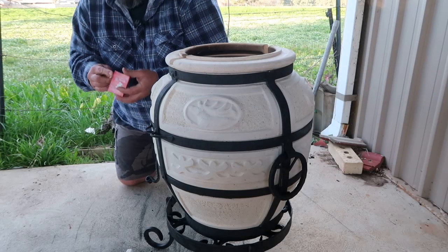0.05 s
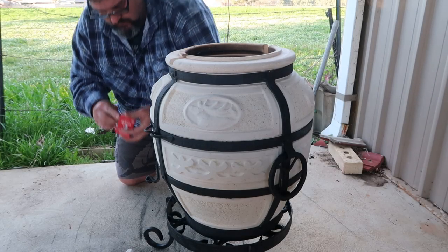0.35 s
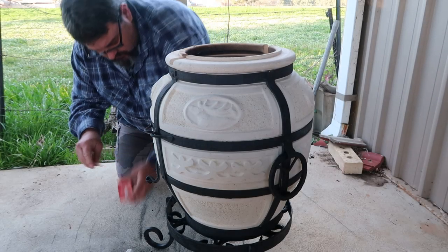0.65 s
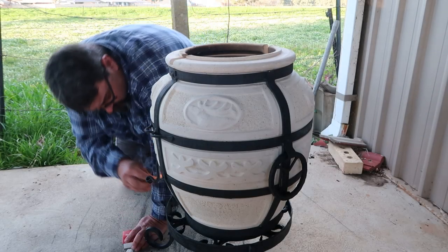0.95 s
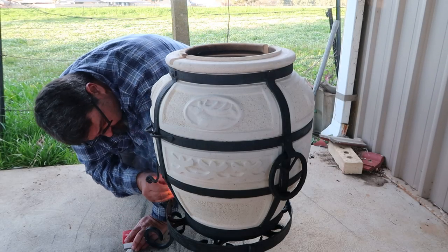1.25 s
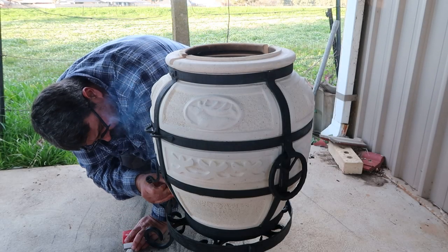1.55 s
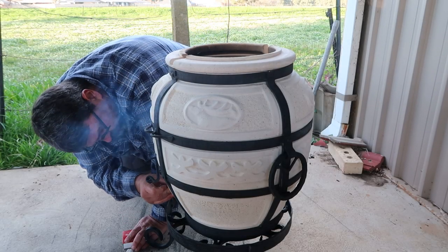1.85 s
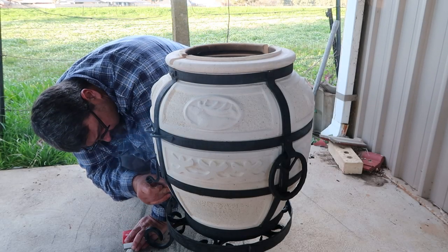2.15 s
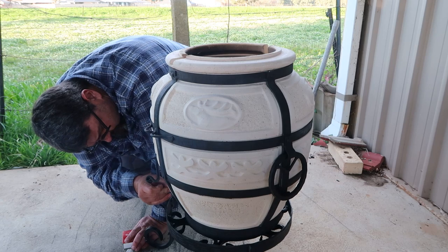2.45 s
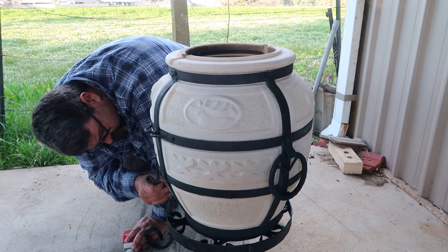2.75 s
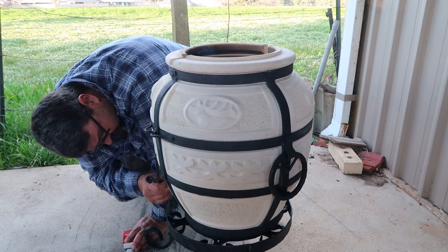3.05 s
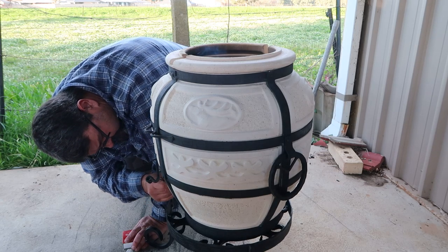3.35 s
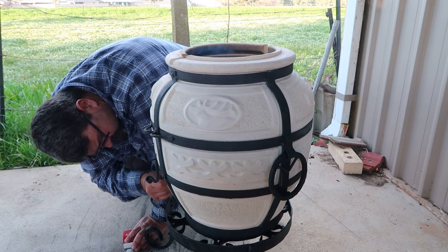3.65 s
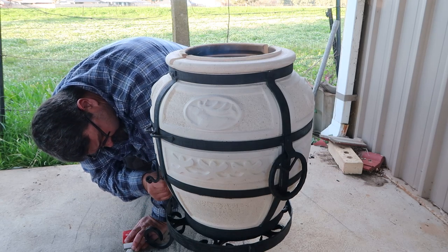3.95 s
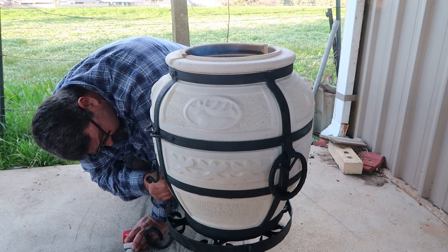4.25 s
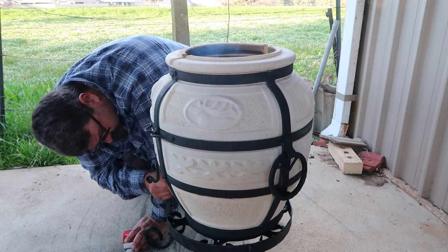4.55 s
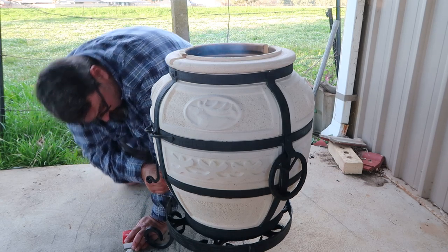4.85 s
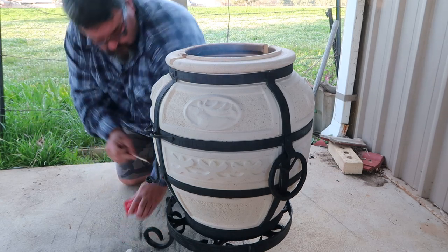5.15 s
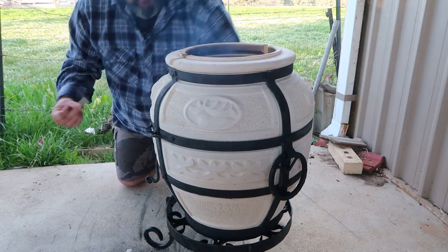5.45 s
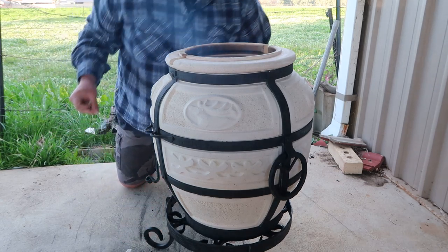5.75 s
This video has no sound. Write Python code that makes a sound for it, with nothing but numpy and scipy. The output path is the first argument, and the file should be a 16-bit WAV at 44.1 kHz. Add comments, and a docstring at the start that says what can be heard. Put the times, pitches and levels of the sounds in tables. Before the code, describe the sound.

After faint match ticks, a matchbox clatters down on concrete; then birds chirp far off over a low outdoor rumble and cloth rustles.

```python
"""A matchbox knocks, drags and settles on the concrete of a quiet porch. Each knock makes the cardboard
ring and the sticks rattle, and wall and roof throw the sound back. Just before, a match is struck with
small ticks and a fizz. Birds call in the distance over a low outdoor rumble, with a few soft thumps and
one sharp snap. Near the end, clothes rustle louder as the person straightens up."""
import sys
import numpy as np
from scipy import signal
from scipy.fft import rfft, irfft, next_fast_len
from scipy.io import wavfile
from scipy.ndimage import uniform_filter1d

SR = 44100
rng = np.random.default_rng(int(sys.argv[2]) if len(sys.argv) > 2 else 0)


def master_out(mix):
    """Clip the mix to full scale and print it as 16-bit PCM to the path in sys.argv[1]."""
    frames = np.transpose(np.atleast_2d(mix))
    ceiling = np.clip(frames, -1, 1)
    pcm = np.round(ceiling * 32767).astype(np.int16)
    wavfile.write(sys.argv[1], SR, pcm)


N = 256333
T = np.arange(N) / SR

# tone of the distant rumble and hiss: f/Hz, level/dB
AIR_TONE = [(20, -18.5), (38, -2.5), (55, 0), (82, 0.5), (100, -7), (125, -7), (160, -8), (200, -17),
            (400, -17), (1000, -19), (1500, -27), (3000, -33.5), (12400, -51.5), (14500, -59), (15500, -80)]
# tone of rubbing cloth: f/Hz, level/dB
CLOTH_TONE = [(60, -7.5), (150, -2), (350, -1), (650, -6), (1200, -10.5), (2500, -23.5), (5000, -35),
              (14000, -50), (15500, -66)]
# how loud the far chorus of small birds is: t/s, level/dB
CHORUS_LEVELS = [(0, -66), (1.5, -85), (3.5, -86), (4.6, -66.5), (5.8, -72)]
# ticks and scuffs of match, fingers and knees: t/s, level/dB, centre f/Hz, rise time/s
HANDLING_TICKS = [(0.008, -47, 1800, 0.0018), (0.13, -45.5, 2070, 0.002), (0.198, -47, 1860, 0.00089),
                  (0.338, -46, 1930, 0.0022), (0.375, -45, 2180, 0.003), (0.475, -44, 1480, 0.0005),
                  (4.556, -41, 770, 0.0073), (5.257, -34.5, 944, 0.0094), (5.508, -39.5, 600, 0.0024),
                  (5.732, -36, 557, 0.0033), (5.75, -41.5, 1390, 0.0018)]
# soft scrapes, sliding sticks and the match head's fizz: middle t/s, half length/s, level/dB, centre f/Hz
SOFT_SCRAPES = [(0.19, 0.055, -63, 2400), (0.398, 0.025, -64, 5500), (1.421, 0.19, -66, 4070),
                (5.283, 0.016, -61, 3950), (5.506, 0.023, -60.5, 5300)]
# falling chirps of small birds: t/s, length/s, start f/Hz, end f/Hz, level/dB, roughness 0-1
SMALL_BIRD_CHIRPS = [(0.539, 0.11, 2950, 2650, -57.5, 0.3), (0.529, 0.085, 4240, 3920, -62.5, 0.4),
                     (1.277, 0.08, 2940, 2600, -55, 0.25), (1.479, 0.052, 3900, 3600, -59, 0.4),
                     (1.71, 0.053, 2300, 2130, -61, 0.14), (2.439, 0.074, 4230, 3860, -61.5, 0.6),
                     (2.545, 0.048, 3210, 2950, -64, .4), (2.692, 0.152, 2330, 2240, -61, 0.5),
                     (2.947, 0.026, 3240, 2880, -55, 0.1), (2.99, 0.026, 3150, 2750, -60, .1),
                     (3.51, 0.064, 4410, 3930, -64.5, 0.5), (3.578, 0.052, 3900, 3600, -60, 0.6),
                     (3.68, 0.045, 2830, 2580, -60, 0.2), (3.76, 0.08, 3060, 2820, -56, 0.45),
                     (3.866, 0.058, 2164, 1980, -55.5, 0.61), (4.157, 0.032, 3250, 2750, -60, 0.3),
                     (4.53, 0.058, 2750, 2590, -57, .75), (4.765, 0.042, 3380, 3030, -57, 0.55),
                     (4.845, 0.047, 2600, 2450, -58, 0.3), (4.97, 0.044, 2280, 2200, -63, 0.47),
                     (5.193, 0.065, 2935, 2700, -57.5, 0.78), (5.279, 0.05, 3120, 2440, -48, 0.1),
                     (5.335, 0.045, 2490, 2350, -55.5, .2), (5.592, 0.023, 2960, 2750, -57, .3),
                     (5.643, 0.043, 2710, 2480, -53, 0.34), (5.716, 0.026, 2560, 2400, -50, 0.3)]
# overlapping notes of a larger, hoarse bird: t/s, length/s, start f/Hz, end f/Hz, level/dB, roughness 0-1
HOARSE_BIRD_NOTES = [(3.931, 0.037, 1400, 1297, -52, 0.65), (3.978, 0.06, 1083, 940, -50, 0.47),
                     (4.009, 0.14, 1930, 1820, -53, 0.31), (4.15, 0.1, 1525, 1423, -46.5, 0.5),
                     (4.19, 0.075, 1863, 1782, -49, 0.5), (4.28, 0.075, 1543, 1232, -46.5, 0.51),
                     (4.276, .17, 1790, 1572, -50, 0.64), (4.349, 0.13, 1280, 1180, -52.5, 0.42)]
# corners, edges and faces of the box hit the slab: t/s, level/dB, box pitch as a ratio, centre f/Hz,
# bass/dB, upper ring/dB, treble/dB (these three against the centre), rattle/dB (against the blow)
BOX_KNOCKS = [(0.74, -7, 1.1, 1300, -1, 2, 18, 12), (0.7473, 10, 1.1, 750, -2, 0.5, 9.5, 4),
              (0.7516, 13.5, 1, 750, -0.5, -0.5, -1.5, 1), (0.758, 7, 0.93, 750, -1, 3, -1, 3),
              (0.838, -5, 1.02, 1110, -22, 0, -23, 18), (0.926, -2.5, 1.07, 1410, -21, -12, -17, 14),
              (0.9338, -2.5, 1.1, 1180, -23, -7, -14.5, 15.5), (1.0281, 1, 0.78, 1360, -13, -10, -16, 2.5),
              (1.0348, 3, 0.955, 1580, -12, -11.5, -27, -2.5), (1.0887, -3, 1.15, 1300, -11, 0, -2, 12),
              (1.0954, 8.5, 0.87, 1240, -6.5, -7, -4, -0.5), (1.1005, 5, 0.86, 1280, -10.5, -6.5, -10, 2.5),
              (1.1039, 10.5, 0.958, 1250, -15.5, -16, -17, -5)]
# pitches at which box and sticks ring: f/Hz, width/Hz, level/dB (against the crack)
BOX_RINGS = [(533, 50, 14), (785, 56, 6.5), (875, 68, 0), (1049, 36, 9), (1140, 50, -1), (1358, 116, 2),
             (1530, 53, -6), (1905, 60, -2), (2070, 51, -1), (2280, 71, 0), (2796, 67, 1), (3070, 65, -3),
             (3196, 65, 2), (3560, 67, -3), (4020, 60, -1), (4500, 55, -12)]
# tone of the dry crack as the box lands: f/Hz, level/dB
CRACK_TONE = [(80, -16), (200, -5), (340, -4), (450, -8.5), (685, -3.5), (790, 5.5), (950, 0.5), (1400, -1),
              (2000, 0), (2700, 0), (3600, -3.5), (5000, -8.5), (6500, -9), (8000, -14.5), (12500, -18),
              (15500, -46)]
# tone of the box dragging over concrete: f/Hz, level/dB
DRAG_TONE = [(500, -7), (1300, 4), (2500, -5), (10000, -8)]
# low soft thumps: middle t/s, level/dB
LOW_THUMPS = [(2.354, -35.5), (3.092, -32.5), (3.178, -34), (4.522, -36), (4.683, -32), (5.635, -30.5)]
# pitches that ring in the snap: f/Hz, level/dB, time to fade by 60 dB/s
SNAP_RINGS = [(340, -34, 0.057), (564, -26, 0.009), (1110, -26.5, 0.0085), (1660, -37, 0.011),
              (2600, -27.5, 0.0054), (2920, -28.5, 0.0046), (3790, -54, 0.14)]
# softening of the snap's treble: f/Hz, level/dB
SNAP_TONE = [(3500, -0.5), (7000, -9), (15000, -24)]
# stereo width of the matchbox: f/Hz, side level/dB (against the middle)
BOX_STEREO = [(100, -27), (300, -17), (700, -25), (1300, -16.5), (2400, -12.5), (4400, -5.5), (8000, 1),
              (14000, 7)]
# stereo width of the sounds around it: f/Hz, side level/dB (against the middle)
AIR_STEREO = [(60, -17), (110, -15), (200, -10), (380, -8), (700, -11), (1290, -8), (2380, -3.5),
              (4400, -1), (15000, 1)]


def undb(db):
    """Turn decibels into a number to multiply by."""
    return 10 ** (np.asarray(db) / 20)


def unit(x):
    """Scale a sound to an average power of one."""
    return x / np.sqrt(np.mean(x ** 2))


def unit_energy(x):
    """Scale a sound so that its squares add up to one."""
    return x / np.sqrt(np.sum(x ** 2))


def add(track, s, x):
    """Mix x into the track from second s on."""
    i = max(int(s * SR), 0)
    track[i:i + len(x)] += x[:N - i]


def gain_curve(points, size):
    """Join (f/Hz, level/dB) points into a gain for every frequency."""
    hz, db = np.transpose(points)
    return undb(np.interp(np.log(np.fft.rfftfreq(size, 1 / SR) + 1), np.log(hz), db))


def colour(x, points):
    """Shape the tone of a sound to follow (f/Hz, level/dB) points."""
    size = next_fast_len(len(x) + 2048, real=True) // 2 * 2
    cepstrum = irfft(np.log(gain_curve(points, size)))
    # fold it so that the filter rings only after a sound, never before
    cepstrum[1:size // 2] *= 2
    cepstrum[size // 2 + 1:] = 0
    return irfft(rfft(x, size) * np.exp(rfft(cepstrum)))[:len(x)]


def even(x):
    """Smooth out the chance peaks in a burst's tone, so it has no pitch of its own."""
    hz = np.fft.rfftfreq(len(x), 1 / SR)
    power = uniform_filter1d(np.abs(rfft(x)) ** 2, int(90 / hz[1]))  # average over 90 Hz
    excess_db = 10 * np.log10(power / power.mean() + 1e-9)
    return unit_energy(colour(x, np.column_stack([hz + 1, -excess_db])))


def band(x, hz, spread):
    """Keep mainly the frequencies from hz / spread to hz * spread."""
    return signal.sosfilt(signal.butter(1, [hz / spread, hz * spread], "band", fs=SR, output="sos"), x)


def walk(rate, size):
    """A random wobble, about one in size, with about rate turns a second."""
    turns = rng.standard_normal(4096)
    return np.interp(np.arange(size) / SR * rate, np.arange(len(turns)), turns)


def grit(size, scatter_db):
    """A stream of tiny clicks of very unequal size."""
    return unit(rng.standard_normal(size) * undb(scatter_db * np.minimum(rng.exponential(size=size), 5)))


def echo(fade_s, treble_fade_s, build_s):
    """Many reflections blur together, build up, then drop 60 dB in each fade time."""
    t = T[:SR // 2]
    low, high = (signal.sosfilt(signal.butter(2, 2500, kind, fs=SR, output="sos"),
                                rng.standard_normal(len(t))) for kind in ("low", "high"))
    fading = low * 1e-3 ** (t / fade_s) + high * 1e-3 ** (t / treble_fade_s)
    return unit_energy(fading * (1 - np.exp(-t / build_s)))


def convolve(x, response):
    """Pass a sound through an echo or a ringing body, keeping its length."""
    return signal.fftconvolve(x, response)[:len(x)]


def stereo(mid, side, width):
    """Make left and right from a middle and a side sound; the side runs a quarter cycle ahead."""
    size = next_fast_len(N, real=True)
    side = irfft(1j * gain_curve(width, size) * rfft(side, size), size)[:N]
    return np.array([mid + side, mid - side])


def outdoors(level_db=-44.5, sway_db=1):
    """A distant rumble sways a little under a smooth hiss."""
    mid, side = (unit(colour(rng.standard_normal(N), AIR_TONE)) for _ in range(2))
    sway = band(mid, hz=39, spread=1.05) * (undb(sway_db * walk(20, N)) - 1)
    return undb(level_db) * stereo(mid + sway, side, AIR_STEREO)


def clothes(crouch_db=-55.5, bend_end_s=0.55, rise_start_s=4.12):
    """Cloth rubs unevenly: faint in the crouch, louder while bending down and getting up."""
    bend_db = 6.5 * np.maximum(bend_end_s - T, 0)
    rise_db = 7.5 * np.maximum(T - rise_start_s, 0)
    gain = undb(crouch_db + bend_db + rise_db + walk(22, N))
    mid, side = (gain * unit(colour(grit(N, scatter_db=2.5), CLOTH_TONE)) for _ in range(2))
    return stereo(mid, side, AIR_STEREO)


def whistle(length_s, start_hz, end_hz, rough):
    """One gliding bird note. A rough one wavers and pulses; a low one also has reedy overtones."""
    size = int(length_s * SR)
    progress = np.linspace(0, 1, size)
    waver = 0.008 * walk(130, size) + 0.12 * rough ** 2 * walk(590, size)
    hz = (end_hz + (start_hz - end_hz) * (1 - progress) ** 1.393) * (1 + waver)
    phase = 2 * np.pi * np.cumsum(hz) / SR
    overtones = walk(700, size) * (np.sin(2 * phase) + np.sin(3 * phase))
    tone = np.sin(phase) + (start_hz < 2000) * rough * undb(-10) * overtones
    swell = 2 * np.sqrt(progress * (1 - progress))
    flutter = unit(undb(5 * rough * walk(148, size)))
    return swell * flutter * tone


def far_chorus(count=260, lowest_hz=2350, range_hz=600):
    """Small birds far away cheep at random; the higher cheeps are softer."""
    out = np.zeros(N)
    for when, pitch, length in rng.random((count, 3)):
        hz = lowest_hz + range_hz * pitch ** 2
        cheep = whistle(0.012 + 0.027 * length, hz, hz, rough=0.686)
        add(out, when * N / SR, undb(-4 * pitch) * cheep)
    return unit(out) * undb(np.interp(T, *np.transpose(CHORUS_LEVELS)))


def birds(echo_db=-4):
    """Nearer birds call over the chorus, all blurred by echoes from trees and walls."""
    out = np.zeros(N)
    for s, length_s, start_hz, end_hz, db, rough in SMALL_BIRD_CHIRPS + HOARSE_BIRD_NOTES:
        add(out, s, undb(db) * whistle(length_s, start_hz, end_hz, rough))
    out += far_chorus()
    mid, side = (undb(echo_db) * convolve(out, echo(0.63, 0.2, build_s=0.0013)) for _ in range(2))
    return stereo(out + mid, side, AIR_STEREO)


def ticks(decay_s=0.018):
    """Wood and fingers touch, each time with a short burst of tiny clicks."""
    t, out = T[:SR // 8], np.zeros(N)
    for s, db, hz, rise_s in HANDLING_TICKS:
        tone = [(hz / 4, -18), (hz / 1.34, 0), (hz, -2), (hz * 3, -25), (15000, -52)]
        tick = unit(colour(grit(len(t), scatter_db=2), tone))
        add(out, s, undb(db) * tick * (1 - np.exp(-t / rise_s)) * np.exp(-t / decay_s))
    return out


def scrapes():
    """The match scrapes and fizzes and sticks slide: gritty hisses that swell and fade."""
    out = np.zeros(N)
    for s, half_s, db, hz in SOFT_SCRAPES:
        tone = [(hz / 5, -25), (hz / 2, -9), (hz, 0), (hz * 1.25, -7), (hz * 2.4, -14), (16000, -32)]
        hiss = unit(colour(grit(SR, scatter_db=2), tone))
        start_s = max(s - 0.5, 0)
        swell = np.exp(-((start_s + T[:SR] - s) / half_s) ** 2)
        add(out, start_s, undb(db) * hiss * swell)
    return out


def box_tap(pitch):
    """One tap on the box: a dry crack and short cardboard rings, whose pitch shifts with the grip."""
    t = T[:SR // 4]
    rings = sum(undb(db) * 2 * np.pi * width / SR * np.exp(-np.pi * width * t)
                * np.cos(2 * np.pi * hz * pitch * t) for hz, width, db in BOX_RINGS)
    return unit_energy(colour(signal.unit_impulse(len(t)) + rings, CRACK_TONE))


def box_knocks(crush_s=0.0008):
    """Each landing briefly crushes the cardboard and shakes the loose sticks into a rattle."""
    t, out = T[:SR // 4], np.zeros(N)
    for s, db, pitch, hz, bass_db, upper_db, treble_db, rattle_db in BOX_KNOCKS:
        blow = rng.standard_normal(len(t)) * np.exp(-t / crush_s)
        rattle_s = 0.0016 * undb(rattle_db)  # a stronger rattle lasts longer
        rattle = grit(len(t), scatter_db=3.5) * t * np.exp(-2 * t / rattle_s)
        push = even(unit_energy(blow) + undb(rattle_db) * unit_energy(rattle))
        # each contact has its own tone: bass below the centre, an upper ring above it, treble at the top
        tone = [(hz / 1.94, bass_db), (hz / 1.46, bass_db / 3), (hz, 0),
                (hz * 1.68, upper_db), (12000, treble_db)]
        knock = convolve(colour(push, tone), box_tap(pitch))
        add(out, s, undb(db) * unit_energy(knock))
    return out


def porch(x, scatter_db=-1, ring_db=-3):
    """Add quick echoes off slab, oven and ribbed wall, and the short ring of the open-sided porch."""
    versions = []
    for _ in range(2):
        scatter = undb(scatter_db) * echo(0.041, 0.064, build_s=0.001)
        ring = undb(ring_db) * echo(0.3, 0.28, build_s=0.0034)
        versions.append(convolve(x, even(signal.unit_impulse(SR // 2) + scatter + ring)))
    mid, side = versions
    return stereo(mid, side, BOX_STEREO)


def box_drag(start_s=1.034, rise_s=0.0051, hold_s=0.047, swell_db_per_s=86, release_db_per_s=480):
    """Before it settles, the box drags over the concrete, pressed harder as it goes."""
    rubbing = colour(convolve(grit(N, scatter_db=2), box_tap(pitch=0.94)), DRAG_TONE)
    age = np.maximum(T - start_s, 0)
    held = np.minimum(age, hold_s)
    level_db = -33.5 + swell_db_per_s * held - release_db_per_s * (age - held)
    return unit(rubbing) * np.minimum(age / rise_s, 1) * undb(level_db)


def stick_zing(start_s=1.117, hz=5000, level_db=-28, decay_s=0.008):
    """The sticks give a brief, bright zing as the box settles."""
    t, out = T[:SR // 4], np.zeros(N)
    zing = band(band(grit(len(t), scatter_db=6), hz, spread=1.08), hz, spread=1.08)
    add(out, start_s, undb(level_db) * unit(zing) * np.exp(-t / decay_s))
    return out


def thumps(hz=50, half_s=0.022):
    """Each soft thump is a few slow swings of air pressure, alike in both ears."""
    out = sum(undb(db) * np.exp(-((T - s) / half_s) ** 2) * np.cos(2 * np.pi * hz * (T - s))
              for s, db in LOW_THUMPS)
    return np.array([out, out])


def snap(start_s=3.0665, rise_s=0.00042):
    """One sharp snap, perhaps kindling in the clay oven: a few pitches ring and quickly fade."""
    t, out = T[:SR // 4], np.zeros(N)
    rings = sum(undb(db) * np.sin(2 * np.pi * hz * t) * 1e-3 ** (t / fade_s)
                for hz, db, fade_s in SNAP_RINGS)
    add(out, start_s, colour(rings * (1 - np.exp(-t / rise_s)), SNAP_TONE))
    return out


def small_sounds(echo_db=-4):
    """Ticks, scrapes and the snap share a short echo; the snap gets less of it."""
    handling, crack = ticks() + scrapes(), snap()
    echoing = undb(echo_db) * (handling + undb(-5) * crack)
    mid, side = (convolve(echoing, echo(0.2, 0.26, build_s=0.0023)) for _ in range(2))
    return stereo(handling + crack + mid, side, AIR_STEREO)


def scene():
    """Everything on and around the porch."""
    matchbox = box_knocks() + stick_zing() + box_drag()
    return porch(matchbox) + small_sounds() + birds() + thumps() + clothes() + outdoors()


def record(dry, ceiling=0.8, top_hz=16000):
    """Round off the tallest peaks and cut the highest treble."""
    rounded = ceiling * np.tanh(dry / ceiling)
    return signal.sosfilt(signal.ellip(10, 0.2, 80, top_hz, fs=SR, output="sos"), rounded)


dry = scene()
out = record(dry)
master_out(out)
```